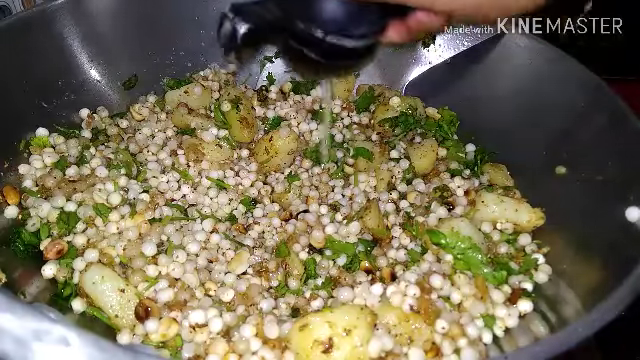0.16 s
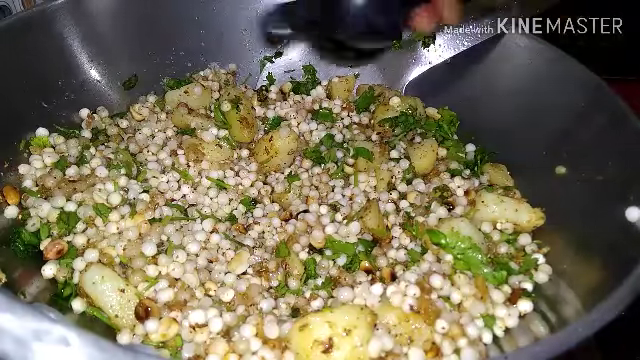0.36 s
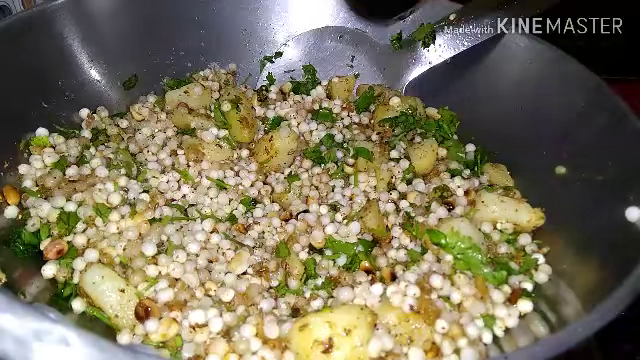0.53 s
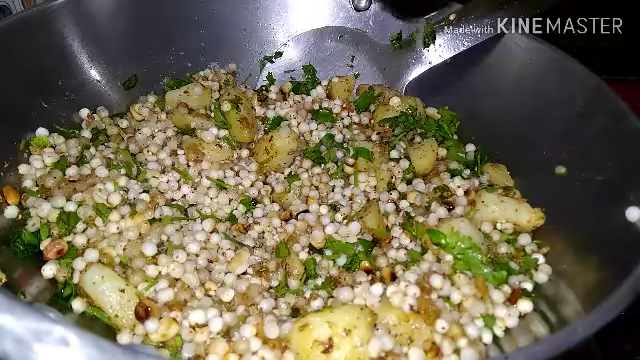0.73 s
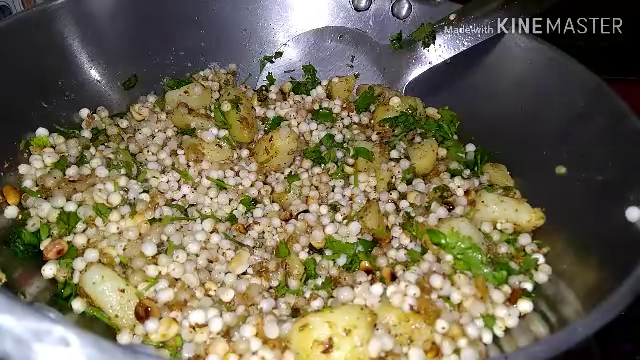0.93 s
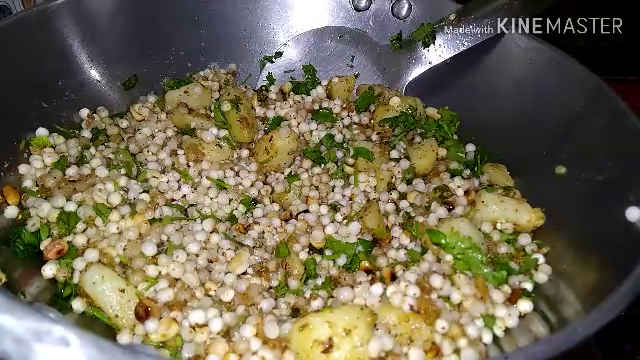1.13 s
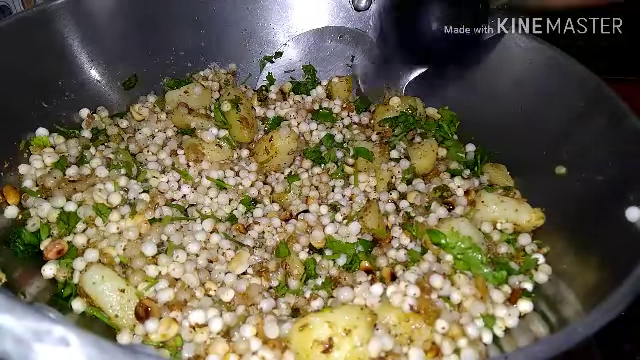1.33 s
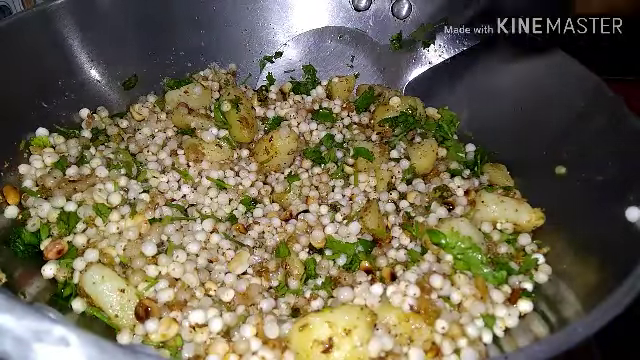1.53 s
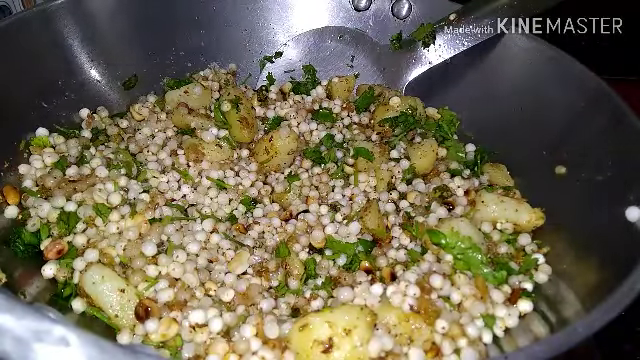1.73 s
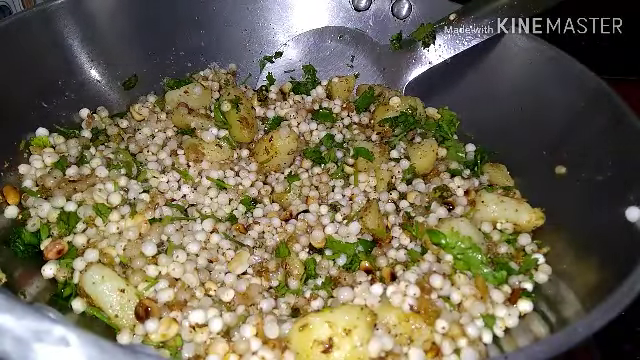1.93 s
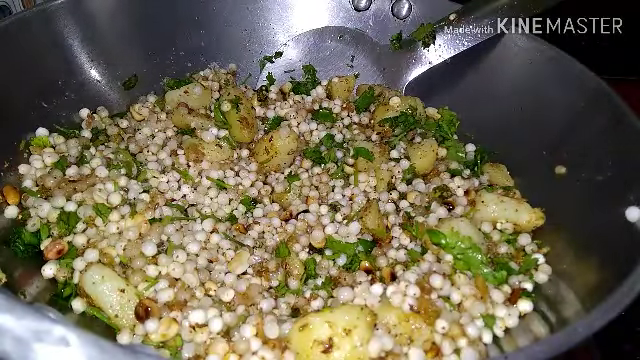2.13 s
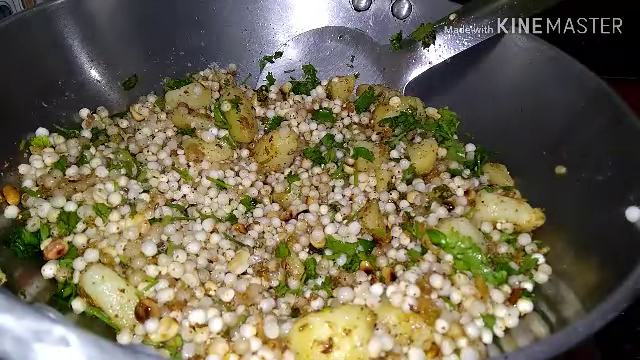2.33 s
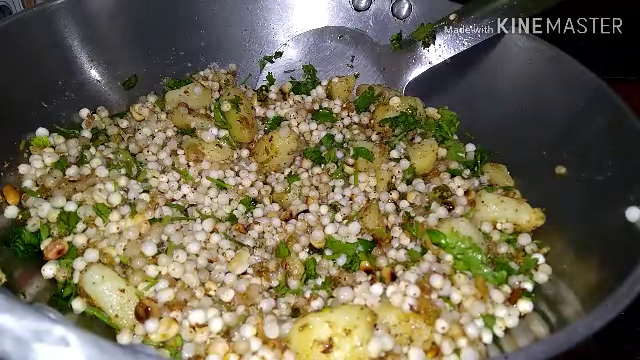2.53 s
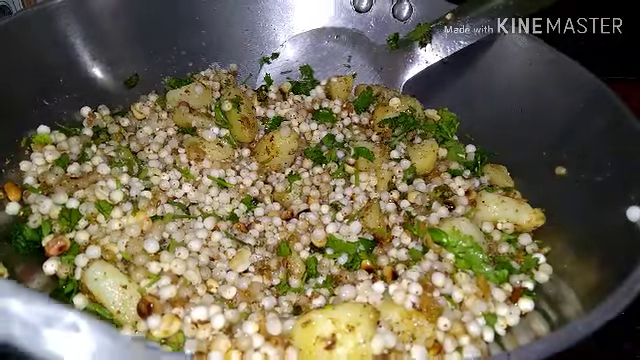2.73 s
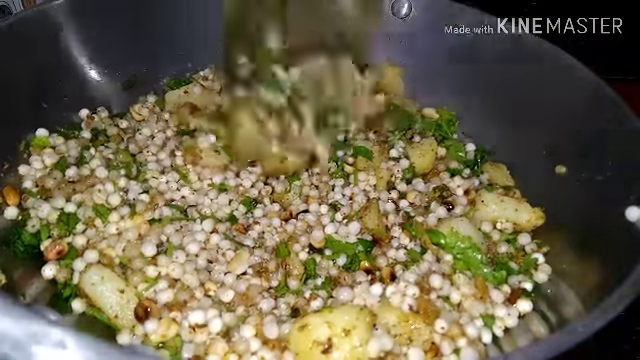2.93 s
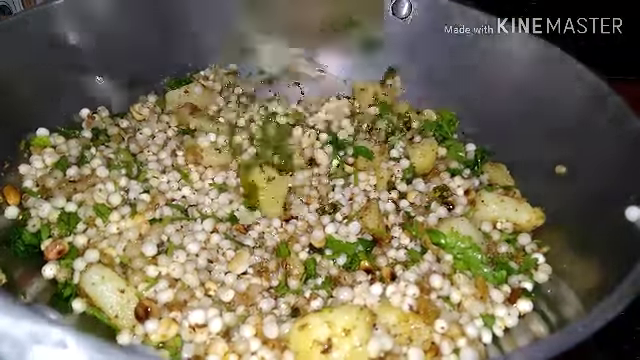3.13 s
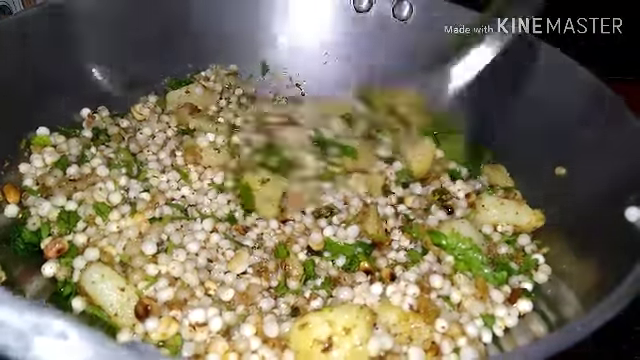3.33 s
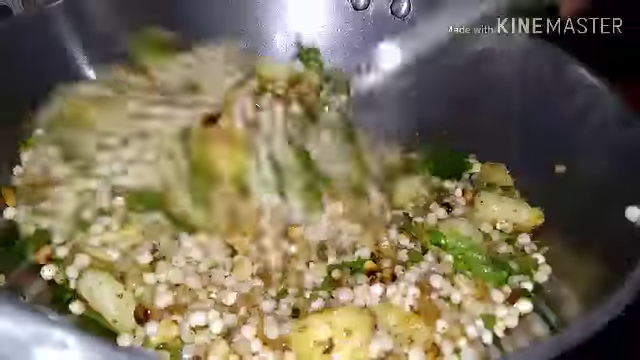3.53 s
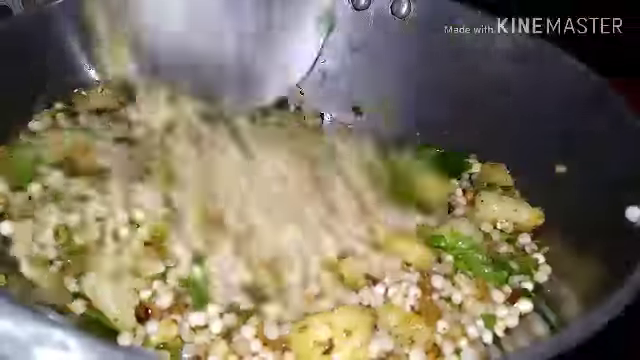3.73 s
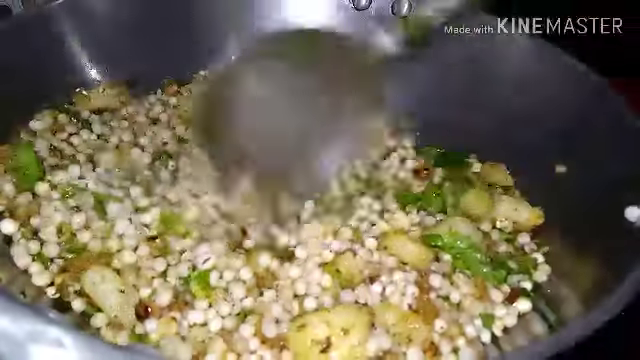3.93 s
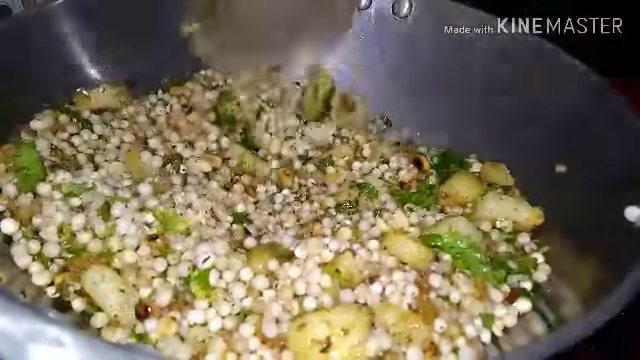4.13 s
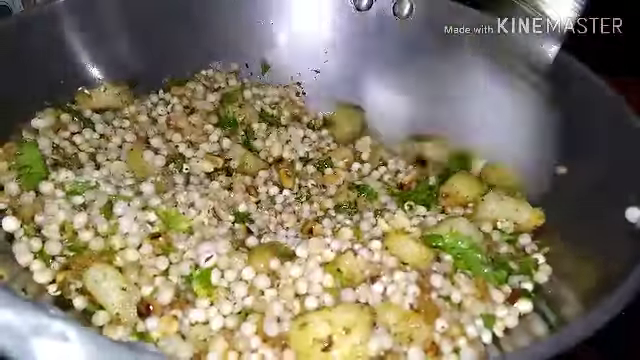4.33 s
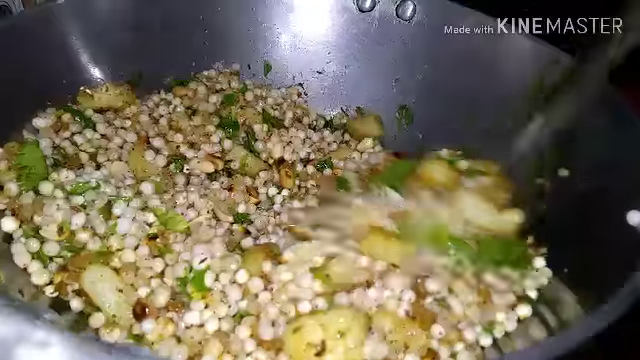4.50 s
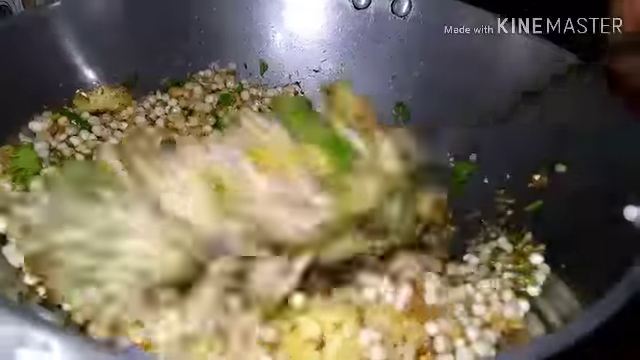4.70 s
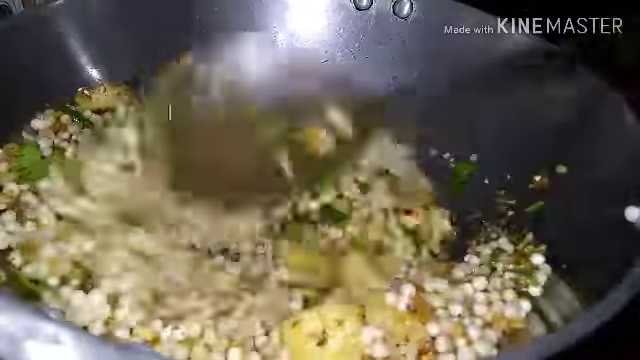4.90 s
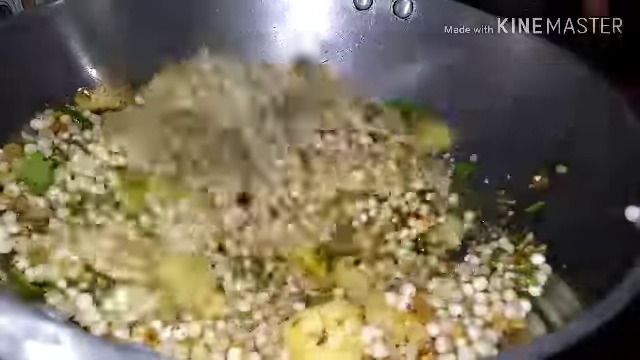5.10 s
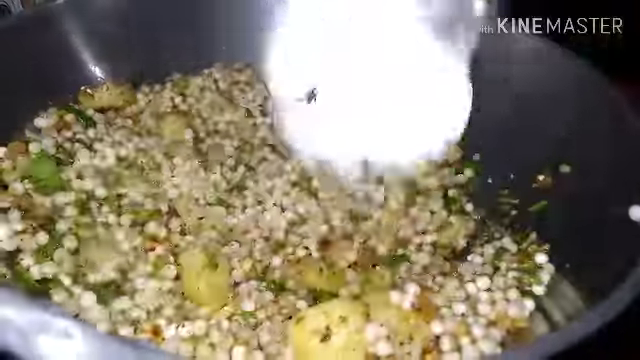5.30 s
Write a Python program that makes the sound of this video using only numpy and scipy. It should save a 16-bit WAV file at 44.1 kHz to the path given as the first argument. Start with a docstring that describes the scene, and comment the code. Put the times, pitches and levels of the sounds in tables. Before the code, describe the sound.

Close to a deep metal pan in a small kitchen, fine high sizzling runs throughout, swelling briefly as liquid drips in. One sharp bright tick snaps midway. Then a metal skimmer digs in with hollow knocks and rough scrapes in bursts, and the turned food fries louder and fuller. Close stereo phone pickup, slightly gated and watery, with little room.

```python
"""A small kitchen: food sizzles in a deep steel pan close to a phone. Thousands of tiny noise bursts make the fizz
and a lower steam hiss; juice dripped on the hot metal swells them. Then a metal skimmer digs in: short pushes knock
and rough jolts scrape the pan, whose low modes boom, and the turned food hisses louder. Sharp ticks of metal and
spitting fat, faint hums and low puffs lie around it."""
import sys
import numpy as np
from scipy import signal
from scipy.fft import rfft, irfft
from scipy.io import wavfile
from scipy.ndimage import uniform_filter1d

SR = 44100
rng = np.random.default_rng(int(sys.argv[2]) if len(sys.argv) > 2 else 0)


def gain_from_decibels(decibels):
    """Convert decibel values to linear amplitude factors."""
    exponent = np.asarray(decibels, float) / 20
    return 10 ** exponent


def unload_audio(sound):
    """Save the sound as a 16-bit wav file, at the path given as the first command line argument."""
    columns = np.transpose(np.atleast_2d(sound))
    # keep every value between -1 and 1, then stretch to whole-number steps
    steps = np.round(np.clip(columns, -1, 1) * 32767)
    wavfile.write(sys.argv[1], SR, steps.astype(np.int16))


N = 236189
T = np.arange(N) / SR  # s
HZ = np.maximum(np.arange(N // 2 + 1) * SR / N, 1)  # f/Hz of each spectrum line

# Steady floor, tone colour: f/Hz, relative level per Hz/dB
FLOOR_SPECTRUM = [(12, -47), (20, 31.5), (60, 10.5), (122, -5), (360, -19), (509, -40), (943, -41.5),
                  (2000, -40), (2600, -56), (4400, -120)]
# Faint low puffs: centre t/s, length/s, level/dB
LOW_PUFFS = [(0.2, 0.016, -81), (0.272, 0.014, -86), (0.359, 0.0073, -70), (0.43, 0.011, -68),
             (0.445, 0.012, -68), (0.538, 0.0087, -72), (0.617, 0.0092, -64), (0.806, 0.098, -65.5),
             (0.902, 0.014, -73), (1.128, 0.092, -63.5), (1.251, 0.055, -77), (1.51, 0.17, -68),
             (1.682, 0.1, -66), (1.954, 0.0064, -66), (2.062, 0.021, -72.5), (2.154, 0.018, -69),
             (2.231, 0.04, -73), (2.334, 0.0099, -70.5), (2.402, 0.0069, -55), (2.52, 0.006, -70),
             (2.564, 0.0087, -69.5), (3.827, 0.01, -75), (4.114, 0.017, -64)]
# Faint narrow hums that come and go: start t/s, end t/s, f/Hz, filter width/Hz, mean level/dB
NARROW_HUMS = [(0.693, 0.865, 1163, 68, -56), (0.733, 0.886, 846, 63, -61.5),
               (0.71, 0.857, 1740, 340, -62.5), (0.847, 0.964, 1320, 760, -58.5),
               (0.81, 1.2, 2490, 97, -74), (1.076, 1.171, 414, 25, -52.5), (1.03, 1.153, 1400, 1100, -69.5),
               (1.215, 1.237, 394, 63, -55), (1.26, 1.28, 350, 140, -62.5), (1.417, 1.46, 680, 78, -59.5),
               (1.46, 1.6, 745, 15, -58), (1.45, 1.78, 1030, 81, -72), (1.48, 1.56, 670, 41, -54.5),
               (1.623, 1.734, 601, 42, -55.5), (1.45, 1.52, 350, 110, -64.5), (2.51, 2.58, 780, 39, -75.5),
               (2.505, 2.52, 430, 150, -74)]
# Sharp ticks of metal and spitting fat:
# t/s, level/dB, centre f/Hz, hissing tail re crack/dB, blow to the steel part re crack/dB
SHARP_TICKS = [(0.046, -36.5, 4160, -16, -43), (0.185, -37, 10900, -16.5, -71),
               (0.215, -31, 11000, -60, -62), (0.2856, -38, 11000, -4.5, -59),
               (0.3885, -42, 11500, -21, -66), (0.456, -36, 11500, -20, -63),
               (0.575, -44.5, 3780, -15, -62), (1.9949, -12, 11600, -24, -22),
               (2.039, -33, 11520, -7.5, -56), (2.7524, -35, 2380, -3.5, -53),
               (2.957, -44.5, 3240, -4.5, -33), (3.1196, -18, 7230, -18.5, -28.5),
               (3.327, -39.5, 4050, 1.5, -42), (3.377, -38, 2640, -1, -56), (4.237, -21.5, 7100, -36, -54),
               (4.4262, -33, 2600, -24, -37), (4.742, -32, 2230, -6.5, -32), (5.204, -39, 2120, -20, -39.5)]
# Thin steel part rung by the ticks, before its band-pass: f/Hz, level/dB, t60/s
STEEL_MODES = [(2650, -6, 0.05), (4850, 10, 0.045), (5090, 10, 0.03), (4620, -2, 0.03), (5650, 9, .025),
               (6300, 9, 0.03), (6750, 9, 0.03)]
# Modes of the deep pan: f/Hz, level/dB, t60 before the food damps it/s
PAN_MODES = [(170.5, 1, 0.29), (260.7, -6.5, 0.15), (300, -2, 0.12), (343, -5.5, 0.13), (392, -3, 0.086),
             (456, -4.5, 0.1), (489, -6, 0.077), (515.6, -2, 0.082), (608.7, -9.5, 0.2), (628.5, -6, 0.14),
             (756, 0, 0.14), (877.5, -4.5, 0.19), (999, -4, 0.1), (1174, -5.5, 0.085), (1555, -9.5, 0.11),
             (1670, -6, 0.11), (1966, 8.5, 0.04), (2460, -5.5, .05)]
# Skimmer knocks on the pan: t/s, level/dB, push length/ms, favoured mode f/Hz
PAN_KNOCKS = [(2.757, -32, 2.9, 300), (2.855, -35, 1.14, 300), (2.953, -56, 0.74, 756),
              (3.108, -27.5, 1.1, 330), (3.122, -30.5, 0.95, 1070), (3.141, -31, 1.46, 256),
              (3.165, -37, 0.86, 456), (3.243, -37.5, 1.7, 300), (3.31, -25, 3.3, 300),
              (3.314, -29, 1, 900), (3.377, -17, 0.92, 322), (3.402, -31, 1.3, 300), (3.426, -32, 1.4, 300),
              (3.446, -26.5, 1.4, 342), (3.495, -33, 1.05, 510), (3.995, -42, 2, 300),
              (4.003, -41, 1.6, 705), (4.227, -52, 0.49, 756), (4.302, -46, 1.5, 260),
              (4.268, -48.5, 1.1, 477), (4.347, -35.5, 1.8, 260), (4.377, -33, 1.6, 260),
              (4.417, -19, 1.14, 515), (4.421, -22, 1.6, 300), (4.44, -26, 0.82, 515),
              (4.487, -36, 1.15, 473), (4.53, -30, 1.9, 340), (4.578, -32, 1.4, 337),
              (4.61, -34.5, 1.25, 383), (4.738, -21.5, 1.3, 343), (4.756, -26.5, 1.3, 507),
              (4.79, -34, 1.4, 503), (5.208, -21, 1.5, 300), (5.242, -27.5, 2.2, 267),
              (5.285, -27.5, 1.8, 344)]
# Strokes of the skimmer along the pan:
# hardest contact t/s, rise/s, time until it lifts off/s, boom level/dB, rasp level/dB, favoured mode f/Hz
SKIMMER_STROKES = [(2.747, 0.0075, 0.18, -31.5, -46.5, 300), (2.859, 0.09, 0.018, -38, -43, 300),
                   (2.955, 0.0076, 0.047, -77, -50.5, 770), (3.117, 0.0062, 0.033, -20, -33.5, 278),
                   (3.181, 0.039, 0.24, -32, -44, 450), (3.316, 0.04, 0.11, -35.5, -47, 300),
                   (3.386, 0.06, 0.29, -25, -34, 318), (3.447, 0.2, 0.045, -29.5, -57, 330),
                   (3.502, .04, 0.13, -36, -71, 423), (3.921, 0.061, 0.11, -85, -55.5, 890),
                   (4.001, 0.019, 0.055, -36.5, -51, 323), (4.054, 0.059, 0.039, -45.5, -69, 495),
                   (4.231, 0.012, 0.012, -68, -46, 777), (4.26, 0.024, 0.0099, -73, -56, 476),
                   (4.305, 0.033, 0.046, -41, -67, 260), (4.359, 0.048, 0.058, -34.5, -37.5, 266),
                   (4.418, 0.0084, 0.118, -20, -33.5, 475), (4.531, 0.059, 0.094, -31, -37.5, 338),
                   (4.612, 0.033, 0.15, -36, -40, 343), (4.739, 0.017, 0.067, -23.5, -40.5, 510),
                   (4.83, 0.045, 0.092, -38, -45, 440), (5.211, 0.019, 0.029, -24, -35, 347),
                   (5.259, 0.05, .2, -27.5, -43, 310)]
# Gritty rasp of the scrape, tone colour: f/Hz, relative level per Hz/dB
RASP_SPECTRUM = [(470, -4), (770, 8.5), (822, -13.5), (900, 5), (1330, 6), (1660, 8.5), (4320, 0),
                 (6660, -22), (8000, -4.5), (10400, -21), (17600, -120)]
# How hard the fat fries: t/s, fine fizz level before a fixed lift/dB, steam hiss level/dB
FRY_LEVELS = [(0.0, -46.5, -93), (.13, -44, -75), (.68, -44, -82), (.79, -41.5, -68), (.93, -38, -51),
              (1.0, -40, -57.5), (1.15, -40.5, -59.5), (1.25, -42, -72), (1.4, -44, -72), (1.44, -39, -61),
              (1.5, -38, -46.5), (1.64, -34, -46.5), (1.75, -37.5, -45.5), (1.87, -39.5, -59.5),
              (2.0, -38, -54), (2.2, -41.5, -72.5), (2.73, -43.5, -67.5), (2.76, -38.5, -40),
              (3.0, -41.5, -51.5), (3.1, -39.5, -56), (3.13, -37, -52), (3.3, -35.5, -34),
              (3.6, -33.5, -45.5), (3.9, -36, -39.5), (4.2, -33, -41), (4.45, -31.5, -34),
              (4.6, -32.5, -37), (5.0, -33, -42), (5.356, -32.5, -37.5)]
# Fine fizz, tone colour: f/Hz, relative level per Hz/dB
FIZZ_SPECTRUM = [(1470, -35), (2500, -24), (2770, -4), (3040, -45), (3310, -7), (4140, -7.5), (5500, -5.5),
                 (6400, -5.5), (7650, -3), (9010, 0.5), (10000, 5), (10750, 7), (11600, 4.5), (13000, 2),
                 (14900, -0.5), (15600, -4), (16000, -41)]
# Steam hiss, tone colour: f/Hz, relative level per Hz/dB
STEAM_SPECTRUM = [(600, -44), (800, -26), (1180, -11.5), (2000, -2), (2800, -1.5), (3050, -3.5), (3300, -2),
                  (4250, -8), (6550, -7), (9000, 0), (11700, -18), (19800, -120)]
# How far narrow bands swell and thin out, before scaling by the layer: f/Hz, depth/dB
PATCH_DEPTH = [(0, 3.3), (6000, 3.3), (8500, 1.8), (11000, 1.3), (12500, 2), (22050, 2)]
# Left-right likeness of the wide layers: f/Hz, likeness/0-1
STEREO_LIKENESS = [(60, 1), (130, 0.9), (290, 0.76), (640, 0.75), (1410, 0), (3100, 0.01), (6820, 0),
                   (15000, 0.07)]
# Balance of the two ports: f/Hz, left minus right level/dB
PORT_BALANCE = [(60, 2), (110, 5), (200, 5), (380, 4.5), (700, 7.5), (1290, 4), (2380, 2), (4400, 2.5),
                (8120, 3.5), (15000, 0.5)]


def unit(x):
    """Scale to rms 1."""
    return x / np.sqrt(np.mean(x ** 2))


def over_hz(table):
    """Read (Hz, value) points on a log-frequency axis."""
    hz, value = np.transpose(table)
    return np.interp(np.log(HZ), np.log(hz), value)


def colour(x, spectrum):
    """Give a white signal a spectrum, rms 1."""
    return unit(irfft(rfft(x) * gain_from_decibels(over_hz(spectrum)), N))


def high_pass(x, order, hz):
    """Butterworth low cut."""
    return signal.sosfilt(signal.butter(order, hz, "high", fs=SR, output="sos"), x)


def band(x, hz, width):
    """A resonance with gain 1 at its centre."""
    return signal.lfilter(*signal.iirpeak(min(hz, SR * .4), hz / width, SR), x)


def walk(rate):
    """Random levels held 1 / rate s and slewed twice; spread near 1."""
    k = int(SR / rate)
    levels = np.repeat(rng.standard_normal(N // k + 1), k)
    return unit(uniform_filter1d(uniform_filter1d(levels, k), k)[:N])


def pair(draw):
    """Left and right from two draws of a source, alike in the bass and nearly unrelated in the treble."""
    like = np.clip(over_hz(STEREO_LIKENESS), 0, .98)
    mid = rfft(draw()) * np.sqrt(1 + like)
    side = rfft(draw()) * np.sqrt(1 - like)
    return irfft(np.array([mid + side, mid - side]), N)


def crackle(rate, spread_db):
    """Tiny bursts of both signs, rate per second on average, a few much louder than the rest."""
    here = rng.random(N) < rate / SR
    return unit(here * rng.standard_normal(N) * gain_from_decibels(spread_db * rng.exponential(size=N)))


def patchy(x, deeper):
    """Narrow bands swell and thin out at random, each on its own."""
    patch_hz, patch_s = 220, .08
    hz, s, z = signal.stft(x, SR, nperseg=1024)
    field = rng.standard_normal(z.shape[1:])
    for axis, size in enumerate([patch_hz * 1024 / SR, patch_s * SR / 512]):
        field = uniform_filter1d(field, size=max(int(size), 1), axis=axis)
    depth_db = np.outer(np.interp(hz, *np.transpose(PATCH_DEPTH)), np.interp(s, T, deeper))
    # the second term keeps the mean power the same
    gain = gain_from_decibels(depth_db * unit(field) - np.log(10) / 20 * depth_db ** 2)
    return signal.istft(z * gain, SR, nperseg=1024)[1][:, :N]


def ring(x, modes):
    """A sum of decaying modes, each starting at its dB for a unit blow; the food damps any longer ring."""
    food_t60_s = .2
    out = 0
    for hz, db, t60 in modes:
        keep = gain_from_decibels(-60 / (min(t60, food_t60_s) * SR))  # decay per sample
        turn = 2 * np.pi * hz / SR  # phase per sample
        out = out + gain_from_decibels(db) * signal.lfilter([0, keep * np.sin(turn)], [1, -2 * keep * np.cos(turn), keep ** 2], x)
    return out


def favour(hz):
    """Gain of each pan mode (rows) for contacts (columns): modes away from hz are shaken less."""
    db_per_octave = 18
    octaves = np.abs(np.log2(np.transpose(PAN_MODES)[0][:, None] / np.asarray(hz)))
    return gain_from_decibels(-db_per_octave * np.minimum(octaves, 0.8))


def radiate(x):
    """The pan is too small to send out deep bass."""
    return high_pass(x, 5, 232)


def room(x):
    """Kitchen tail: decaying noise, different at each ear."""
    t60_s, level_db = .35, -11
    t = T[:SR // 2]
    tail = rng.standard_normal((2, len(t))) * np.exp(-np.log(1000) * t / t60_s)
    tail *= np.minimum(t / 0.0013, 1)  # soft onset
    tail /= np.sqrt(np.sum(tail ** 2, 1, keepdims=True))
    return gain_from_decibels(level_db) * signal.fftconvolve(x, tail, axes=1)[:, :N]


def rumble(booms):
    """Short low puffs of band-passed crackle over a quiet floor of noise; the strokes shake the stove too."""
    floor_db, shake_db, fade_db_per_s = -87.5, -32, 1000
    gain = 0
    for s, length, db in LOW_PUFFS:
        outside = np.maximum(np.abs(T - s) - length / 2, 0)
        gain = gain + gain_from_decibels(db - fade_db_per_s * outside)
    puffs = band(band(pair(lambda: crackle(220.0, 1.0)), 105.0, 41.0), 110.0, 162.5)
    puffs = unit(high_pass(puffs, 4, 95.))
    deep = colour(pair(lambda: rng.standard_normal(N)), FLOOR_SPECTRUM)
    return (gain + gain_from_decibels(shake_db) * booms.sum(0)) * puffs + (gain_from_decibels(floor_db) + gain_from_decibels(-8) * gain) * deep


def hums():
    """Rough narrow bands of noise that start softly and fade away."""
    rise_s, fade_s = .025, .06
    out = 0
    for start, end, hz, width, db in NARROW_HUMS:
        gate = np.clip(np.minimum((T - start) / rise_s, (end - T) / fade_s + .5), 0, 1) ** 2
        hum = unit(band(band(rng.standard_normal(N), hz, 2 * width), hz, width))
        out = out + gain_from_decibels(db + 2.2 * walk(60.)) * gate * hum
    return out * np.ones((2, 1))


def ticks():
    """A short noise crack with a hissing tail, and apart from it the ringing of the steel part."""
    crack_t60_s, tail_t60_s = .012, .32
    widest_hz, width_share = 4540, 0.73  # lower ticks are narrower
    cracks, force, t = np.zeros((2, N)), np.zeros(N), T[:SR // 4]
    for s, db, hz, tail_db, steel_db in SHARP_TICKS:
        start = int(s * SR)
        width = min(widest_hz, width_share * hz)
        fade = gain_from_decibels(-60 * t / crack_t60_s) + gain_from_decibels(tail_db - 60 * t / tail_t60_s)
        noise = rng.standard_normal((2, len(t)))
        hiss = unit(band(band(band(noise, hz, width), hz, width), hz, 2 * width))
        cracks[:, start:][:, :len(t)] += (gain_from_decibels(db) * fade * hiss)[:, :N - start]
        force[start] = gain_from_decibels(db + steel_db)
    cracks = cracks * gain_from_decibels(np.array([[1], [-1]]))  # left 2 dB above right
    steel = band(band(ring(force, STEEL_MODES), 5200.0, 5850.0), 5200.0, 7700.0)
    return cracks, steel * np.array([[1], [.3]])


def knocks():
    """Each knock is a smooth push into the pan's modes; a softer contact pushes longer."""
    struck = np.zeros((len(PAN_MODES), N))
    for gains, (s, db, ms, _) in zip(favour(np.transpose(PAN_KNOCKS)[3]).T, PAN_KNOCKS):
        push = np.hanning(max(int(ms * SR / 1000), 3))
        struck[:, int(s * SR):][:, :len(push)] += gain_from_decibels(db) * np.outer(gains, push / push.sum())
    pan = 0
    for k, (blows, mode) in enumerate(zip(struck, PAN_MODES)):
        pan = pan + (-1) ** (k // 2) * ring(blows, [mode])  # modes start in opposite ways, two by two
    return radiate(pan) * np.ones((2, 1))


def strokes():
    """Each stroke bites quickly, sags while the edge slides on and stops as it lifts: boom gains, one rasp gain."""
    rise_db, hold_s = 22.5, 0.0038
    boom_sag, rasp_sag, lift = 137, 64, 1087.5  # dB per s
    booms, rasp = [], 0
    for s, rise, hold, boom_db, rasp_db, _ in SKIMMER_STROKES:
        ends_db = rise_db * np.minimum(T - s, 0) / rise - lift * np.maximum(T - s - hold, 0)
        booms.append(gain_from_decibels(boom_db + ends_db - boom_sag * np.maximum(T - s - hold_s, 0)))
        rasp = rasp + gain_from_decibels(rasp_db + ends_db - rasp_sag * np.maximum(T - s, 0))
    return np.array(booms), rasp


def scraping(booms, rasp):
    """The edge sticks and slips unevenly: the jolts shake the pan's modes and rasp above them."""
    jolts = pair(lambda: crackle(1500., 1.0)) * gain_from_decibels(1.5 * walk(80.))
    soft = signal.lfilter(*signal.butter(1, 900., fs=SR), jolts)
    size = np.sqrt(np.mean(ring(soft[:, :SR], PAN_MODES) ** 2))  # rms of the freely shaken pan
    shaken = favour(np.transpose(SKIMMER_STROKES)[5]) @ booms
    pan = sum(ring(gain * soft, [mode]) for gain, mode in zip(shaken, PAN_MODES)) / size
    # the heap of food thuds dully around the pan's lower modes
    thud = unit(band(jolts, 490.0, 160.0))
    grit = colour(pair(lambda: crackle(1800., 1.9)), RASP_SPECTRUM)
    grit = patchy(grit, np.ones(N) / 2) * gain_from_decibels(2.15 * walk(51.0))
    return radiate(gain_from_decibels(3.0) * pan + gain_from_decibels(-18.0) * booms.sum(0) * thud) + rasp * grit


def spits():
    """Scattered bright pops of noise, each a few ms long."""
    t60_s = 0.005
    pops = signal.lfilter([1], [1, -gain_from_decibels(-60 / (t60_s * SR))], np.abs(crackle(90., .6)))
    return high_pass(unit(pops * rng.standard_normal(N)), 2, 6000)


def fizz_grains():
    """Dense bursts over smooth noise, with a few loud spits."""
    return crackle(9000., 1.8) + 1.23 * rng.standard_normal(N) + gain_from_decibels(-19) * spits()


def thin_out(fizz, weak_db):
    """A weak fizz thins: its lows sink, and so does all but its strongest band."""
    split_hz, low_cut_db_per_db = 6500, 0.9
    peak_hz, peak_width_hz, narrow_db_per_db = 10730, 840, 1.14
    low = irfft(rfft(fizz) / (1 + (HZ / split_hz) ** 8), N)
    fizz = fizz - low * (1 - gain_from_decibels(-low_cut_db_per_db * weak_db))
    peak = irfft(rfft(fizz) / (1 + (2 * (HZ - peak_hz) / peak_width_hz) ** 4), N)
    return peak + gain_from_decibels(-narrow_db_per_db * weak_db) * (fizz - peak)


def frying():
    """Steam bubbles burst by the thousand in the fat; larger ones hiss lower; a few spit out loud."""
    boil_db, turned_s = -38, 3.12  # below boil_db the fizz counts as weak
    s, fine_db, coarse_db = np.transpose(FRY_LEVELS)
    fine_db, coarse_db = np.interp(T, s, fine_db), np.interp(T, s, coarse_db)
    weak_db = np.maximum(boil_db - fine_db, 0)
    fizz = thin_out(colour(pair(fizz_grains), FIZZ_SPECTRUM), weak_db)
    steam = colour(pair(lambda: crackle(2000.0, 2.0) + 2.1 * rng.standard_normal(N)), STEAM_SPECTRUM)
    # the hiss lacks its low end until the food is turned
    steam = np.where(T < turned_s, high_pass(steam, 3, 1730), steam)
    flicker = walk(30.)
    deeper = 1 + .08 * weak_db  # a weak fizz is patchier
    fizz_gain = gain_from_decibels(1.5) * gain_from_decibels(fine_db + 0.69 * flicker + 0.57 * walk(90.))
    steam_gain = gain_from_decibels(coarse_db + 1.5 * flicker)
    return fizz_gain * patchy(fizz, deeper) + steam_gain * patchy(steam, deeper)


def scene():
    """Everything near the pan, the ticks also off the walls."""
    cracks, steel = ticks()
    booms, rasp = strokes()
    walls = room(cracks + gain_from_decibels(5) * steel)
    metal = scraping(booms, rasp) + knocks() + cracks + steel
    return rumble(booms) + hums() + walls + metal + frying()


def drop_weak_patches(x, share):
    """Narrow patches weaker than their neighbours in frequency drop out on both sides."""
    least_db = -24
    hz, _, z = signal.stft(x, SR, nperseg=1024)
    power = uniform_filter1d(uniform_filter1d(np.abs(z.sum(0)) ** 2, size=5, axis=0), size=4, axis=1)
    around = uniform_filter1d(power, size=25, axis=0)
    strength = share * np.interp(hz, [700, 2000, 7000, 10000], [0.0071, 0.46, 1.35, 0.86])[:, None]
    gain = np.clip((power / (strength * around + 1e-18) - 1) * 2.0, gain_from_decibels(least_db), 1)
    return signal.istft(z * gain, SR, nperseg=1024)[1][:, :N]


def roll_off(x):
    """The treble ends steeply here."""
    return signal.sosfilt(signal.butter(12, 15700, fs=SR, output="sos"), x)


def record(dry):
    """The left port faces the pan a little more; then weak narrow patches drop out."""
    tilt = over_hz(PORT_BALANCE) / 2
    ports = irfft(rfft(dry) * gain_from_decibels(np.array([tilt, -tilt])), N)
    mix = gain_from_decibels(-3.0) * drop_weak_patches(ports, 0.51)
    return roll_off(mix)


dry = scene()
out = record(dry)
unload_audio(out)
```